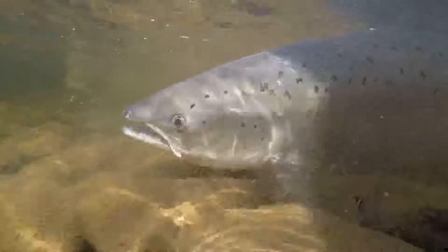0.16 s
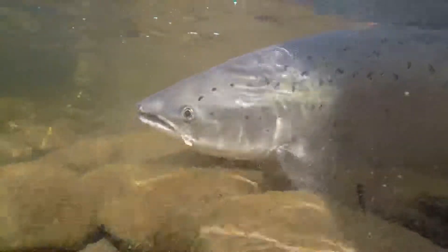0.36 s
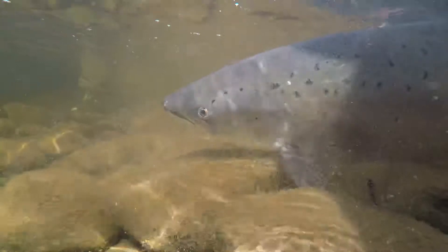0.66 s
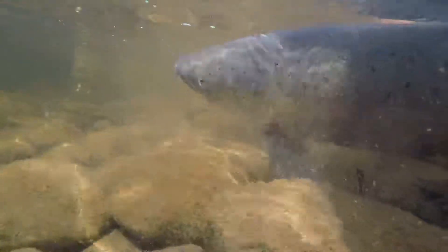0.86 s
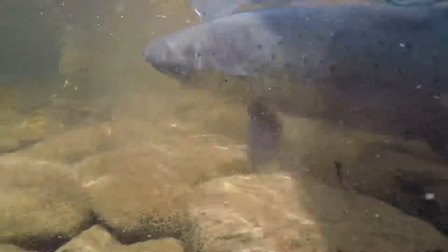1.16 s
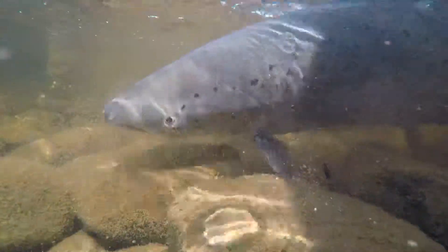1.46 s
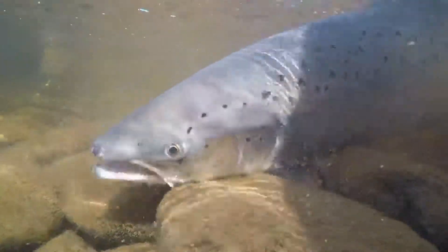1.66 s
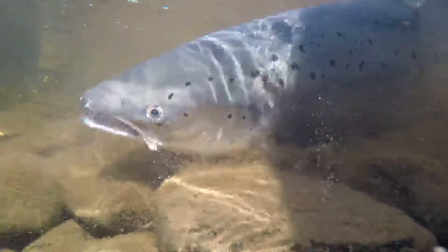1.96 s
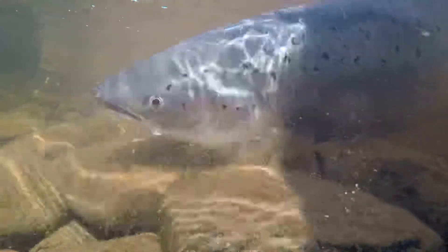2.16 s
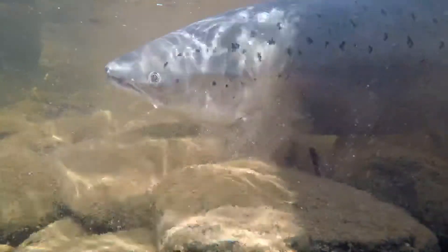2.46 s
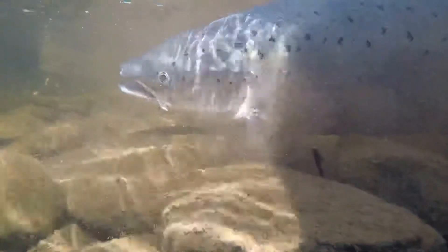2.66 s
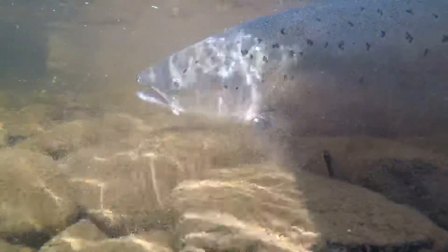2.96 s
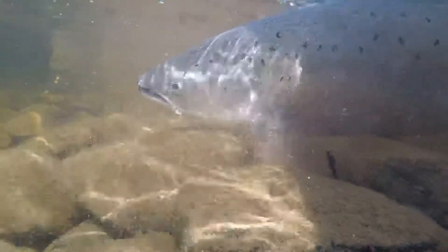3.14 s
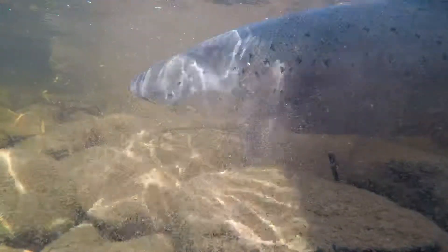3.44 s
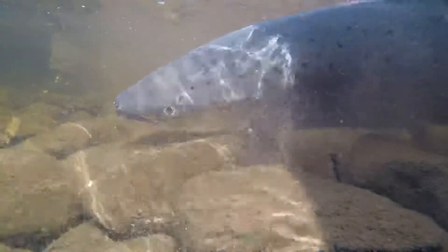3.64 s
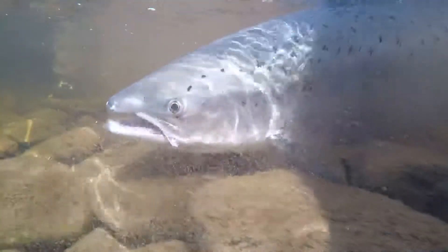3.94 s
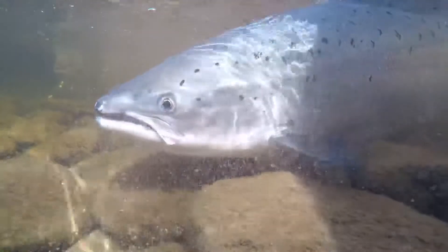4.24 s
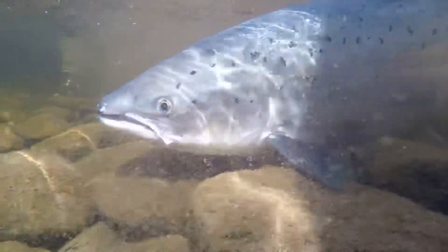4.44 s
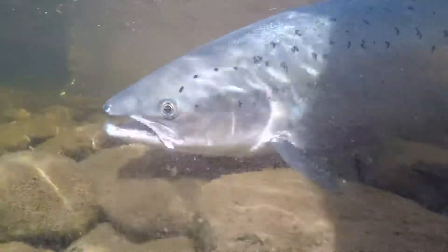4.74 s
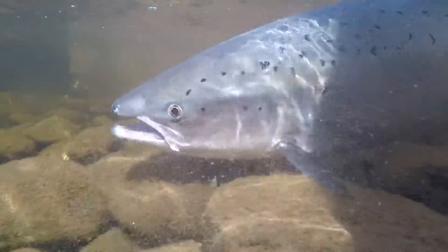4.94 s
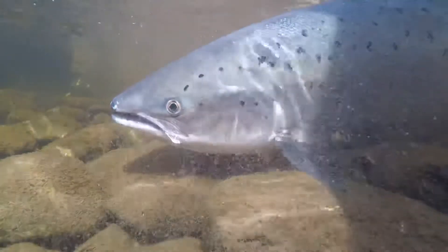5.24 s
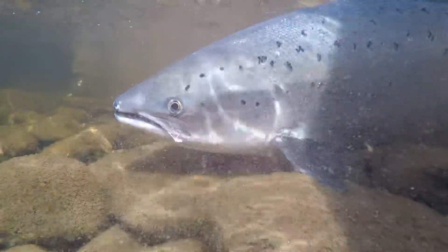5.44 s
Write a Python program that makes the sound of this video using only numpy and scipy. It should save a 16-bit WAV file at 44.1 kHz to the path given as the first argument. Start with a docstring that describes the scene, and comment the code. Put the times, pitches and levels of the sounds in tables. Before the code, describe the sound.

Underwater in a shallow stream, low rushing water and bubbles, case bumps and gritty scraping lead to a harsh crack, a sudden dip, then deeper gulping knocks.

```python
"""A shallow river rumbles and washes round a waterproof camera case lying among the stones.
Filtered noise makes the current and wall drone; decaying sines make knocks, plinks, gulps and bubbles.
The case rattles over pebbles and grit in bursts of short pings, and groans once as slipping partials.
One hard crack against a stone overloads the recorder; its gain control ducks and the river swells back."""
import sys
import numpy as np
from scipy import signal
from scipy.io import wavfile
from scipy.ndimage import uniform_filter1d, minimum_filter1d

SR = 44100
rng = np.random.default_rng(int(sys.argv[2]) if len(sys.argv) > 2 else 0)


def unload_wav(signal):
    """Save mono or channel-first audio to the path in sys.argv[1] as 16-bit WAV at rate SR, clipped to [-1, 1]."""
    wavfile.write(
        sys.argv[1],
        SR,
        np.round(np.clip(np.atleast_2d(signal).T, -1, 1) * 32767).astype(np.int16),
    )


N = 246959
TIME = np.arange(N) / SR  # s

# Strength of the current, as its deep surge on the case; the deep rumble drops briefly just after the crack:
# time_s, # level_db
FLOW = [(0, -20), (.25, -24.5), (.52, -15), (.9, -23), (1.1, -24.5), (2.1, -24.5), (3.2, -25), (3.44, -29),
        (3.65, -15.5), (3.95, -32.5), (4.4, -27), (5.0, -28.5), (5.6, -26.5)]
# Big eddies that bump the case: middle_s, length_s, surge_db, buffet_db
EDDIES = [(0.064, 0.039, -18, -25.5), (0.361, 0.086, -14.5, -22.5), (0.751, 0.14, -20, -25),
          (1.169, .12, -24.5, -26.5), (1.39, 0.066, -14, -18.5), (1.618, 0.082, -14.5, -45),
          (1.803, 0.17, -20, -37), (2.23, 0.064, -25, -48), (2.488, 0.1, -17.5, -19),
          (3.167, 0.19, -42, -19), (3.353, 0.12, -23, -22), (4.012, 0.3, -28, -15.5),
          (4.139, 0.093, -27, -8.5), (4.378, 0.2, -18.5, -17), (4.787, 0.096, -24.5, -23),
          (5.242, 0.089, -14.5, -22), (5.54, 0.087, -43, -20)]
# Turbulence washing over the case: time_s, level_db
WASH = [(0, -34), (.35, -37), (1.3, -33.5), (2.3, -33.5), (3.2, -34), (4.2, -33.5), (5.6, -35.5)]
# Relative noise spectra of surge, buffeting, wash and microphone hiss: frequency_hz, density_db (per Hz)
SURGE_SPECTRUM = [(12, -13.5), (22, 0.5), (32, -4), (46, -1.5), (62, -12.5), (90, -18), (160, -46.5)]
BUFFET_SPECTRUM = [(40, -33), (62, 7.5), (85, 7.5), (120, -2), (165, -22), (220, -17), (400, -57.5)]
WASH_SPECTRUM = [(110, 12), (190, 5), (250, -3), (370, 3.5), (480, 2.5), (720, -2), (1050, 2), (1300, -4.5),
                 (1650, -17), (2200, -24), (3200, -27.5), (4500, -45), (8000, -50.5)]
HISS_SPECTRUM = [(1500, 6.5), (3000, -2), (6000, -1.5), (9500, -1.5), (12000, -8.5), (13500, -24)]
# How alike the two microphones are, negative when they move oppositely: frequency_hz, likeness (-1 to 1)
LIKENESS = [(30, 0.77), (70, 0.97), (130, 0.62), (300, 0.88), (480, 0.087), (700, -0.4), (1200, -0.16),
            (2200, -0.064), (3500, 0.46), (6000, -0.048), (15000, 0.11)]
# Balance of water and case, right-heavy at first, drifting to the left near the end:
# time_s, left_minus_right_db
LEAN = [(0, -0.5), (3.3, -2.4), (4.0, -1), (5.6, 1.5)]
# Resonances of the case wall that the flow keeps droning: pitch_hz, level_db, t60_s
WALL_MODES = [(302.5, 0, 0.069), (375, -8, 0.062)]
# The flow catches the wall and its drone swells: middle_s, length_s, level_db
DRONE_SWELLS = [(.01, 0.11, -29.5), (0.525, 0.38, -35), (2.046, 0.16, -29.5), (4.153, 1.86, -36.5),
                (4.886, 0.18, -26.5), (5.577, 0.34, -30.5)]
# How the case colours the small bubbles of the riffle: frequency_hz, level_db
GURGLE_COLOUR = [(480, 1), (1350, -2.5), (1750, -6), (2500, -12.5)]
# Gulps of water against the case: start_s, level_db, start_pitch_hz, t60_s
GULPS = [(.198, -22.5, 169, 0.053), (.261, -16.5, 200, 0.043), (0.919, -19.5, 237, 0.071),
         (1.155, -19.5, 194, 0.052), (1.649, -14, 157, 0.049), (3.929, -8, 133, 0.12),
         (4.335, -5, 205, 0.074), (4.749, -20, 308, 0.03), (5.188, -19, 306, 0.044)]
# Dull knocks on the case: start_s, strength_db, strongest_pitch_hz, spread_octaves
KNOCKS = [(.274, -18, 160, 1.6), (.649, -12.5, 150, 1.4), (.708, -16.5, 270, 0.43), (.753, -12.5, 212, 1.6),
          (0.87, -19.5, 300, 2.1), (1.071, -11, 175, 1.03), (1.37, -4.5, 270, 0.81),
          (2.782, -9.5, 165, 1.1), (2.98, -12.5, 114, 1.54), (2.994, -15, 278, 0.76),
          (3.052, -16.5, 221, 1.0), (3.145, -18, 280, 1), (3.1654, -13.5, 257, 1.25),
          (3.179, -8, 240, 0.73), (3.205, -13.5, 190, 1.6), (3.216, -14, 131, 1.1), (3.29, -13, 150, 0.91),
          (3.319, -18.5, 149, 1.7), (3.3451, -22.5, 181.5, 1.05), (4.125, -4.5, 314, 0.29),
          (4.82, -9, 360, 0.37), (4.871, -18, 380, 0.36), (5.226, -15.5, 300, 0.7), (5.512, -3, 292, 0.42)]
# How hard the edge of a knock drives the case, against its strength: frequency_hz, level_db
KNOCK_EDGE = [(300, -34), (700, -14.5), (1350, -24)]
# Sharp plinks on the case: start_s, strength_db
PLINKS = [(0.453, -26.5), (0.965, -18), (1.853, -18), (2.479, -18), (3.098, -15), (3.751, -14.5),
          (4.5511, -16), (5.319, -16.5)]
# How hard a plink drives the case, against its strength: frequency_hz, level_db
PLINK_FORCE = [(130, -7.5), (300, 4.5), (700, -8.5), (1350, -3)]
# Modes of the case: pitch_hz, level_db, t60_s, build_up_s, right_lag_rad
CASE_MODES = [(125, -1.5, 0.051, 0.0029, 0.9), (200, -11.5, 0.072, 0.00034, 0.26),
              (294.2, -3, 0.063, 0.0016, 0.77), (388.5, -4.5, 0.02, 0.00031, 0.94),
              (585, 4, 0.0079, 0.0014, 1.93), (897, 5.5, 0.004, 0.00059, 2.6),
              (1360, -4.5, 0.021, 0.0011, 0.92), (1070, -12, 0.015, 0.0012, 2.5)]
# Single large bubbles: start_s, level_db (before the trim), start_pitch_hz, t60_cycles, glide (share of pitch)
BUBBLES = [(1.141, -20.5, 1850, 115, -0.047), (1.198, -15, 1990, 69, -0.051), (1.217, -26, 1420, 49, -0.1),
           (1.228, -26, 1560, 42, 0.0036), (1.257, -33, 2600, 59, 0.015), (1.262, -19, 1010, 100, 0.036),
           (1.291, -10.5, 1603, 47, -0.025), (1.292, -18, 1017, 40, -0.22), (1.302, -15, 1220, 19, -.05),
           (1.323, -26, 1430, 29, -0.013), (1.338, -19, 1070, 17, 0), (1.352, -14, 1174, 79, 0.0092),
           (1.419, -26.5, 8400, 65, .01), (1.443, -15, 1450, 50, -0.073), (3.89, -15.5, 1750, 120, -0.081),
           (5.107, -18.5, 890, 34, -0.0071), (5.486, -29.5, 1850, 79, -0.027)]
# Clouds of small bubbles: start_s, length_s, bubbles_per_s, loudest_db, lowest_hz, highest_hz
CLOUDS = [(1.11, .26, 170, -27.5, 475, 1700), (1.147, .006, 1000, -39.5, 5400, 7000),
          (1.192, .021, 750, -39.5, 3000, 9000), (1.218, .009, 1200, -40, 3400, 7500),
          (1.253, .006, 1800, -40, 2360, 7360), (1.3, 0.24, 65, -43, 1600, 3200)]
# The groan of the rubbing case: time_s, slips_per_s, level_db
GROAN = [(1.78, 100, -70), (1.82, 100, -30.5), (1.86, 96, -29), (1.91, 101.4, -23), (1.96, 103, -20.5),
         (2.0, 101, -28), (2.04, 97, -29.5), (2.09, 102, -37), (2.15, 110, -86)]
# Partials of the groan: multiple (of the slip rate), level_db
GROAN_PARTIALS = [(2, -8), (3, -1), (4, -40), (5, -28)]
# Pebbles clacking on the case: start_s, strength_db, hardness_db (per octave)
CLACKS = [(.65, -25, -8), (.7535, -12, -3), (1.371, -19, -9), (2.783, -14.5, -2.5), (3.0288, -20, -1),
          (3.04, -12, -10), (3.044, -14, -10), (3.052, -10, -0.5), (3.064, -11, -5), (3.0718, -15, -0.5),
          (3.0853, -15, -1), (3.112, -17, -2), (3.1248, -24, -3), (3.136, -22, -2), (3.1464, -11, 0.5),
          (3.166, -24, -1), (3.1792, -24, -2), (3.2072, -10, -7), (3.222, -24, 0), (3.276, -17, -2.5),
          (3.289, -23, -0.5), (3.292, -10.5, -8.5), (3.3215, -24, -1), (3.3337, -14, 0), (3.3443, -10, 3),
          (5.511, -23, -4)]
# What a clack rings with: pitch_hz, level_db, t60_s, right_lag_rad
CLACK_MODES = [(720, 2, .009, 2.65), (1050, -7, .005, 2.6), (1800, -9, .0035, 2.3), (4400, -17, .0025, 1.6)]
# The loudest grains of grit hitting the case: start_s, level_db, pitch_hz, right_lag_rad
GRIT = [(1.601, -27.5, 2060, 0.5), (1.6045, -31, 2300, 1.5), (1.618, -29, 2040, -1.4),
        (1.626, -43, 4500, 1.4), (1.653, -32, 2000, 1.2), (2.143, -31, 1990, 1.3), (2.164, -31, 2090, 1.6),
        (2.1996, -33, 3900, 1.5), (2.251, -13.5, 1760, 1.7), (2.2655, -29, 2070, 2),
        (2.2725, -27, 2000, 1.9), (3.774, -29, 2280, 2)]
# The case drags over the gravel: start_s, length_s, first_db, last_db (base level of its grains)
DRAGS = [(1.594, 0.052, -59, -58), (2.141, 0.14, -52.5, -63), (3.023, 0.16, -35.5, -37.5),
         (3.15, .17, -42.5, -43.5), (3.315, 0.039, -33, -18)]
# Ring of the crack against a stone: pitch_hz, level_db, t60_s
CRACK_MODES = [(750, -4.5, 0.0039), (1370, -4, 0.0023), (3000, -10.5, 0.00039)]

BUFFET_DB, DRONE_DB, HISS_DB = -29, -39, -57  # buffeting at mean flow, steady drone, microphone hiss
BUFFET_FOLLOWS = 0.33  # share of the current's dB swing that the buffeting takes up
GURGLE_DB = -2.5  # the faintest riffle bubbles against the wash, before their colour
CASE_TOP_HZ = 1750  # above this the wall muffles every knock
DRAG_LEAN_DB = 3  # the case drags on its right side, so knocks are louder there
BUBBLE_TRIM_DB = -8.5
CLACK_BUILD_UP_CYCLES, CLACK_DETUNE = .4, .1  # detune is the largest share of pitch
CLACK_TOP_HZ, CLACK_TOP_OCTAVES_PER_DB = 6500, 0.64  # a soft contact loses its treble
DRAG_GRAINS_PER_S, STRAY_GRAINS_PER_S, STRAY_DB = 1300, 29, -44
GRAIN_CYCLES = 9  # cycles until a tick has died by 60 dB
GRIT_TOP_HZ = 5400  # the case dulls the sound of stone above this
CRACK_S, CRACK_DB = 3.3551, 49.5  # time and drive of the crack
CUTOFF_HZ = 16400  # top of the recorder


def from_db(db):
    """Decibels to gain."""
    return 10 ** (np.asarray(db) / 20)


def rms_one(x):
    """Scale to rms 1."""
    return x / np.sqrt(np.mean(x ** 2) + 1e-20)


def in_time(rows):
    """Each column of a curve, at every sample."""
    s, *columns = np.transpose(rows)
    return [np.interp(TIME, s, c) for c in columns]


def at_hz(points, hz):
    """Read a spectrum on a log-frequency axis."""
    points_hz, values = np.transpose(points)
    return np.interp(np.log(hz), np.log(points_hz), values)


def butter(x, edges_hz, kind, order=2):
    """Causal Butterworth filter."""
    return signal.sosfilt(signal.butter(order, edges_hz, kind, fs=SR, output="sos"), x)


def hump(s, length):
    """A smooth rise and fall of height 1 around time s."""
    return np.cos(np.pi * np.clip((TIME - s) / length, -.5, .5))


def drift(rate):
    """Slow chance with a spread of 1, smoothed at about rate Hz."""
    step = 40  # samples between the slow points
    r = np.exp(-2 * np.pi * rate * step / SR)
    noise = rng.standard_normal(N // step + 2002)
    slow = signal.lfilter([1], [1, -2 * r, r * r], noise)[2000:]  # drop the filter's start
    return np.interp(np.arange(N) / step, np.arange(len(slow)), rms_one(slow))


def ring(clicks, hz, t60):
    """A resonator: a unit click sets a decaying sine going."""
    r, w = np.exp(-np.log(1000) / (t60 * SR)), 2 * np.pi * hz / SR
    return signal.lfilter([0, np.sin(w)], [1, -2 * r * np.cos(w), r * r], clicks + 1e-18)


def ping(hz, t60, build_up, lag, glide=0):
    """A stereo sine swells and dies; the right side lags, and the pitch settles a share (glide) away."""
    t = TIME[:int(1.3 * t60 * SR)]
    envelope = (1 - np.exp(-t / build_up)) * np.exp(-np.log(1000) * t / t60)
    pitch = hz * (1 + glide * (1 - np.exp(-4 * t / t60)))
    phase = 2 * np.pi * np.cumsum(pitch) / SR
    return envelope / envelope.max() * np.sin(phase - np.array([[0], [lag]]))


def add(out, s, sound):
    """Mix a sound in at time s."""
    i = int(s * SR)
    out[:, i:i + sound.shape[1]] += sound[:, :N - i]


def pair(mid, side, hz):
    """Left and right from two unrelated sounds, as alike as the microphones are at this pitch."""
    alike = np.clip(at_hz(LIKENESS, hz), -1, 1)
    return np.sqrt(1 + alike) * mid + np.sqrt(1 - alike) * side * np.array([[1], [-1]])


def banded_noise(spectrum, patchy_db, shared_db, rate):
    """Stereo noise in narrow bands that flicker alone and together; rms 1."""
    edges = 12 * 2 ** np.arange(0, 10.7, .4)
    out, together, white = 0, drift(rate), rng.standard_normal((2, 2, N))
    for k, (low, high) in enumerate(zip(edges, edges[1:])):
        hz = np.sqrt(low * high)
        if spectrum[0][0] <= hz <= spectrum[-1][0]:
            gain = from_db(at_hz(spectrum, hz) + patchy_db * drift(rate) + shared_db * together)
            mid, side = butter(white[k % 2], [low, high], "band")
            out = out + gain * pair(mid, side, hz)
    return rms_one(out)


def evened(x, seconds):
    """Take the slow swells out of a noise."""
    power = uniform_filter1d(np.mean(x ** 2, axis=0), int(seconds * SR))
    return x / np.sqrt(power + 1e-4)


def microphone_hiss():
    """The microphones' own faint noise, flickering a little."""
    return from_db(HISS_DB) * banded_noise(HISS_SPECTRUM, patchy_db=1.07, shared_db=0.5, rate=7.5)


def wall_drone():
    """Random pushes of the flow keep the wall's resonances sounding."""
    drive = from_db(DRONE_DB)
    for s, length, level_db in DRONE_SWELLS:
        drive = drive + from_db(level_db) * hump(s, length) ** 2
    tone = 0
    for hz, level_db, t60 in WALL_MODES:
        mid, side = ring(rng.standard_normal((2, N)), hz, t60)
        tone = tone + from_db(level_db) * rms_one(pair(mid, side, hz))
    return butter(drive * tone, 800, "low")


def current():
    """Eddies press on the case; finer turbulence washes over it and keeps its wall droning."""
    (flow_db,), (wash_db,) = in_time(FLOW), in_time(WASH)
    surge_power = from_db(flow_db) ** 2
    buffet_power = from_db(BUFFET_DB + BUFFET_FOLLOWS * (flow_db - flow_db.mean())) ** 2
    for s, length, surge_db, buffet_db in EDDIES:
        bump = hump(s, length)
        surge_power = surge_power + (from_db(surge_db) * bump) ** 2
        buffet_power = buffet_power + (from_db(buffet_db) * bump) ** 2
    surge_noise = banded_noise(SURGE_SPECTRUM, patchy_db=0.5, shared_db=-1.5, rate=0.97)
    buffet_noise = banded_noise(BUFFET_SPECTRUM, patchy_db=3, shared_db=2.5, rate=23.0)
    surge = np.sqrt(surge_power) * evened(surge_noise, seconds=0.11)
    buffet = np.sqrt(buffet_power) * evened(buffet_noise, seconds=0.18)
    wash = from_db(wash_db) * banded_noise(WASH_SPECTRUM, patchy_db=2.0, shared_db=1.0, rate=19.4)
    return surge + buffet + wash + wall_drone()


def gurgle():
    """Many small bubbles ring in the riffle, dulled by the case; their level follows the wash."""
    out, (wash_db,) = np.zeros((2, N)), in_time(WASH)
    born = np.flatnonzero(rng.random(N) < 170 / SR)  # about 170 bubbles per s
    for i, (size, pitch, place) in zip(born, rng.random((len(born), 3))):
        hz = 480 * 5.0 ** pitch
        level_db = wash_db[i] + GURGLE_DB + at_hz(GURGLE_COLOUR, hz) + 7.2 * size ** 2
        bubble = ping(hz, 22 / hz, build_up=0.0006, lag=1.85 + 2 * place, glide=0.087)
        add(out, i / SR, from_db(level_db) * bubble)
    return out


def gulps():
    """Water slaps into a hollow of the case: a low note that drops quickly."""
    out = np.zeros((2, N))
    for s, level_db, hz, t60 in GULPS:
        add(out, s, from_db(level_db) * ping(hz, t60, build_up=0.0077, lag=0.54, glide=-0.61))
    return out


def bubbles():
    """Each bubble swells in a few cycles and rings, its pitch gliding; those in a cloud die sooner."""
    out = np.zeros((2, N))
    for s, level_db, hz, cycles, glide in BUBBLES:
        bubble = ping(hz, cycles / hz, build_up=2.9 / hz, lag=1.73, glide=glide)
        add(out, s, from_db(level_db + BUBBLE_TRIM_DB) * bubble)
    for s, length, rate, loudest_db, low, high in CLOUDS:
        for when, faintness, pitch, bend in rng.random(size=(round(rate * length), 4)):
            hz = low * (high / low) ** pitch
            bubble = ping(hz, 16 / hz, build_up=0.00025, lag=1.57, glide=0.27 * (bend - .5))
            add(out, s + when * length, from_db(loudest_db - 10 * faintness) * bubble)
    return out


def knocks():
    """Knocks and plinks ring the modes of the case, each mode building up and dying at its own speed."""
    out, modes_hz = np.zeros((2, N)), np.array(CASE_MODES)[:, 0]
    blows = []
    for s, strength_db, hz, spread in KNOCKS:
        body_db = -6 * (np.log2(modes_hz / hz) / spread) ** 2
        blows.append((s, strength_db + np.maximum(body_db, at_hz(KNOCK_EDGE, modes_hz))))
    for s, strength_db in PLINKS:
        blows.append((s, strength_db + at_hz(PLINK_FORCE, modes_hz)))
    chance = rng.standard_normal((len(blows), len(CASE_MODES), 2))
    for (s, force_db), draws in zip(blows, chance):
        # louder on the right from the first drag until the crack
        lean_db = DRAG_LEAN_DB * (DRAGS[0][0] < s < CRACK_S) * np.array([[-.5], [.5]])
        for k, (mode, (detune, skew)) in enumerate(zip(CASE_MODES, draws)):
            hz, mode_db, t60, build_up, lag = mode
            gain = (-1) ** k * from_db(force_db[k] + mode_db + lean_db)
            add(out, s, gain * ping(hz * (1 + 0.031 * detune), t60, build_up, lag + 0.57 * skew))
    return butter(out + 1e-18, CASE_TOP_HZ, "low", order=6)


def groan():
    """Stick and slip about a hundred times a second; the case wall favours the third partial."""
    slips, level_db = in_time(GROAN)
    phase = 2 * np.pi * np.cumsum(slips * (1 + 0.0096 * drift(27.6))) / SR
    tone = 0
    for multiple, partial_db in GROAN_PARTIALS:
        gain = from_db(partial_db + 1.0 * drift(25))
        tone = tone + gain * np.sin(round(multiple) * phase - np.array([[0], [.7]]))
    rubbing = (TIME > GROAN[0][0]) & (TIME < GROAN[-1][0])
    return np.sqrt(2) * from_db(level_db) * tone * rubbing


def clacks():
    """Pebbles clack on the case, each with its own detuned modes; harder contacts are brighter."""
    out = np.zeros((2, N))
    chance = rng.uniform(-1.0, 1, (len(CLACKS), len(CLACK_MODES)))
    for (s, strength_db, hardness_db), detunes in zip(CLACKS, chance):
        top_hz = CLACK_TOP_HZ * 2 ** (CLACK_TOP_OCTAVES_PER_DB * hardness_db)
        top_hz = np.clip(top_hz, 1000, GRIT_TOP_HZ)
        for k, ((hz, mode_db, t60, lag), detune) in enumerate(zip(CLACK_MODES, detunes)):
            tilt_db = hardness_db * np.log2(hz / CLACK_MODES[0][0])
            gain = (-1) ** k * from_db(strength_db + mode_db + tilt_db)
            mode = ping(hz * (1 + CLACK_DETUNE * detune), t60, CLACK_BUILD_UP_CYCLES / hz, lag)
            add(out, s, gain * butter(mode, top_hz, "low", order=4))
    return out


def grain(hz, lag):
    """The tick of one grain: a few cycles at its own pitch, and a duller clack of the case."""
    tick = ping(hz, GRAIN_CYCLES / hz, build_up=.0001, lag=lag)
    # the clack lasts longer, so the tick is mixed into it
    out = from_db(-4.5) * ping(0.52 * hz, t60=GRAIN_CYCLES / hz * 2, build_up=0.0003, lag=3.15)
    add(out, 0, tick)
    return out


def grit():
    """Single grains tick on the case, strays drift by, and a dense run of them grinds while it drags."""
    out = np.zeros((2, N))
    for s, level_db, hz, lag in GRIT:
        add(out, s, from_db(level_db) * grain(hz, lag))
    rate, scrape_db = STRAY_GRAINS_PER_S, STRAY_DB
    for s, length, first_db, last_db in DRAGS:
        dragging = (TIME > s) & (TIME < s + length)
        rate = np.where(dragging, DRAG_GRAINS_PER_S, rate)
        drag_db = first_db + (last_db - first_db) * (TIME - s) / length
        scrape_db = np.where(dragging, drag_db, scrape_db)
    born = rng.random(N) < rate / SR
    size, pitch = rng.exponential(1, N), rng.random(N)
    for i in np.flatnonzero(born):
        # low grains are louder than high ones
        level_db = scrape_db[i] + 6.7 * min(size[i], 3) - 24 * pitch[i]
        tick = grain(580 * 7.2 ** pitch[i], lag=2.6 - 2 * pitch[i])
        add(out, i / SR, from_db(level_db) * tick)
    return butter(out + 1e-18, GRIT_TOP_HZ, "low", order=6)


def crack():
    """The case hits a stone: one sharp spike and a short ring, far louder than the recorder can take."""
    out = np.zeros((2, N))
    spike = np.exp(-TIME[:SR // 100] / .00007)
    add(out, CRACK_S, from_db(CRACK_DB - 8.0) * np.array([spike, spike]))
    for hz, mode_db, t60 in CRACK_MODES:
        add(out, CRACK_S, from_db(CRACK_DB + mode_db) * ping(hz, t60, build_up=0.00095, lag=1.77))
    return butter(out + 1e-18, [330, 3200], "band")


def scene():
    """Everything that reaches the microphones, with their own hiss."""
    water = current() + gurgle() + gulps() + bubbles()
    case = knocks() + groan() + clacks() + grit() + crack()
    lean_db, = in_time(LEAN)
    balance = from_db(lean_db * np.array([[.5], [-.5]]))
    return (water + case) * balance + microphone_hiss()


def released(over_db, db_per_s, attack_s, hold_s):
    """Gain reduction that grabs quickly, holds a moment and lets go at a steady rate."""
    span = int(hold_s * SR) + 1
    over_db = -minimum_filter1d(-over_db, span, origin=(span - 1) // 2, mode="nearest")
    held = np.maximum.accumulate(over_db + db_per_s * TIME) - db_per_s * TIME
    r = np.exp(-1 / (attack_s * SR))
    return signal.lfilter([1 - r], [1, -r], held, zi=[r * held[0]])[0]


def record(dry):
    """A slow gain control and a quick limiter above the bass, then overload and the top cut."""
    peak = -minimum_filter1d(-np.abs(dry).max(axis=0), size=21)  # the detector sees a peak a moment ahead
    over_db = np.maximum(20 * np.log10(peak + 1e-9), 0)
    start_db = 7.0  # the slow control is still recovering at first
    slow_over_db = np.maximum(0.46 * over_db, start_db * (TIME == 0))
    slow_db = released(slow_over_db, db_per_s=13.0, attack_s=0.00028, hold_s=0.014)
    quick_db = released(over_db, db_per_s=129.0, attack_s=0.00019, hold_s=0.033)
    extra = from_db(-np.maximum(quick_db - slow_db, 0))
    bass = butter(dry, 125, "low")
    # the bass escapes the limiter's extra reduction
    out = from_db(-slow_db) * (extra * dry + (1 - extra) * bass)
    return butter(np.clip(out, -1, 1), CUTOFF_HZ, "low", order=12)


dry = scene()
out = record(dry)
unload_wav(out)
```